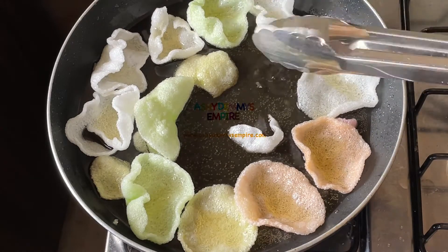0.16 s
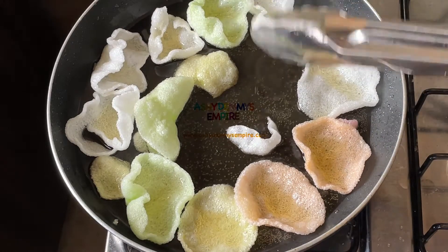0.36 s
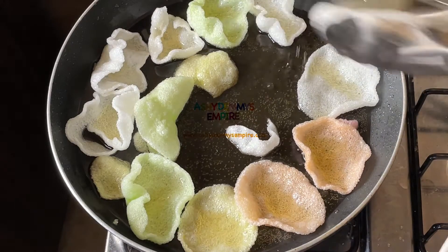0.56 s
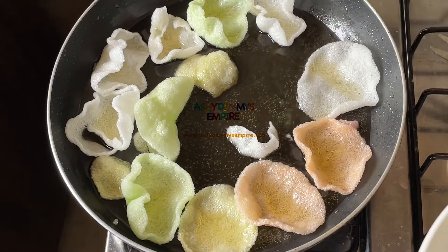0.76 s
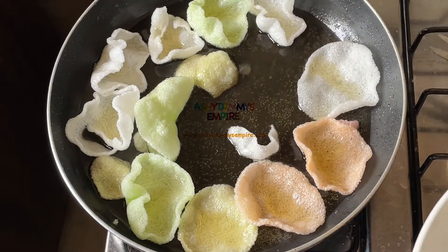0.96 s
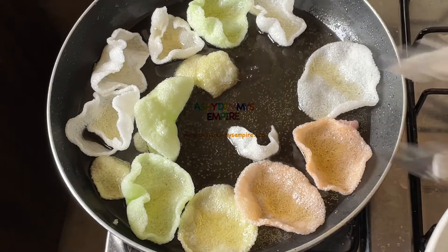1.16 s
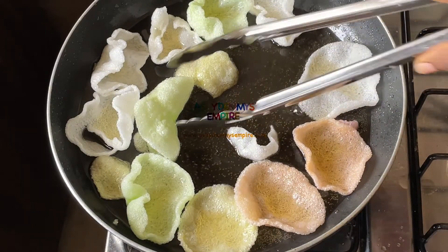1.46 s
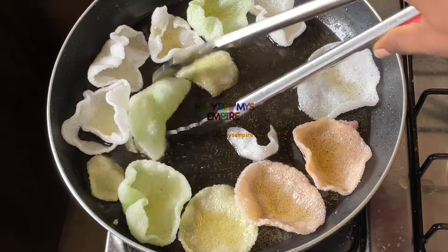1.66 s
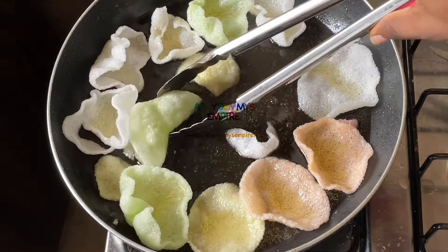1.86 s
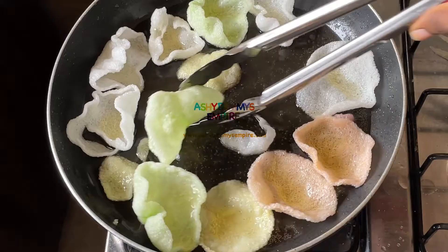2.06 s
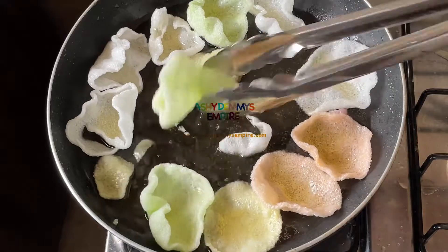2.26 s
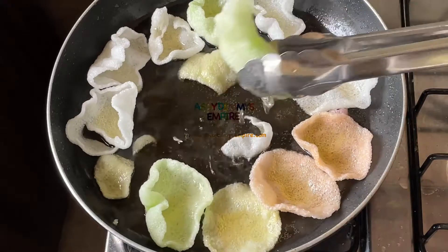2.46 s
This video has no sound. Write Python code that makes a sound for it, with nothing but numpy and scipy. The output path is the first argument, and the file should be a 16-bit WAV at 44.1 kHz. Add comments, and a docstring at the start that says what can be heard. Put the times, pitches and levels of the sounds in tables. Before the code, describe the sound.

Crackers fry in a shallow pan of hot oil: irregular dry pops and tiny bright spits over soft fizz, with two very loud bursts ringing the pan, heard close in stereo in a kitchen with a faint low hum.

```python
"""Puffed crackers fry in a shallow pan of hot oil in a kitchen, heard close by a pair of microphone ports.
Steam pockets tear the skin with a snap and a crack and ring briefly at a pitch; large bursts ring the pan
and splash oil; droplets spit bright noise ticks, one spray hisses, tongs tinkle once and tiny bubbles ring.
The oil fizzes softly as coloured noise, the room answers with a clumpy tail of echoes,
and far off a slow motor hums as a few wavering harmonics."""
import sys
import numpy as np
from scipy import signal
from scipy.fft import rfft, irfft, next_fast_len
from scipy.io import wavfile

SR = 44100
rng = np.random.default_rng(int(sys.argv[2]) if len(sys.argv) > 2 else 0)


def transcribe(signal):
    """Save signal, clipped to [-1, 1], as a 16-bit WAV file at the path in sys.argv[1]."""
    frames = np.atleast_2d(signal).T
    limited = np.clip(frames, -1, 1)
    pcm = np.round(limited * 32767).astype(np.int16)
    wavfile.write(sys.argv[1], SR, pcm)


N = 114660
T = np.arange(12000) / SR   # seconds since the start of one short event


def amp(db):
    """Decibels to a factor of amplitude."""
    return 10 ** (np.asarray(db) / 20)


def rms_one(x):
    """Scales a signal to an rms of 1."""
    return x / np.sqrt(np.mean(x ** 2) + 1e-20)


def at_hz(points, hz):
    """Reads a curve of (f/Hz, value) points along log frequency."""
    point_hz, values = np.array(points).T
    return np.interp(np.log(hz), np.log(point_hz), values)


def drift(rate_hz):
    """Slow chance of rms 1: noise through two equal low-pass poles at rate_hz, run on every 40th sample."""
    pole = np.exp(-80 * np.pi * rate_hz / SR)
    noise = rng.standard_normal(N // 40 + 2002)
    slow = signal.lfilter([1], [1, -2 * pole, pole * pole], noise)[2000:]   # drops the settling
    return np.interp(np.arange(N) / 40, np.arange(len(slow)), rms_one(slow))


def grainy():
    """Noise in uneven millisecond grains."""
    grain_db = 3 * rng.standard_normal(N // 60 + 2)
    return rng.standard_normal(N) * amp(np.interp(np.arange(N) / 60, np.arange(N // 60 + 2), grain_db))


def ring(clicks, hz, t60):
    """A damped resonance: a unit click sets off a sine of height 1 that falls 60 dB in t60 seconds."""
    r = amp(-60 / (max(t60, 1e-3) * SR))
    w = 2 * np.pi * hz / SR
    return signal.lfilter([0, np.sin(w)], [1, -2 * r * np.cos(w), r * r], clicks + 1e-18)


def band(x, low_hz, high_hz):
    """Passes the band between two frequencies."""
    return signal.sosfilt(signal.butter(2, [low_hz, high_hz], "band", fs=SR, output="sos"), x)


def colour(x, spectrum):
    """Weights noise by a spectrum of (f/Hz, level/dB) points."""
    return irfft(rfft(x) * amp(at_hz(spectrum, np.fft.rfftfreq(N, 1 / SR) + 1)), N)


def add(out, start_s, peak_db, sound):
    """Lays a sound in at a moment with a given peak."""
    i = int(start_s * SR)
    out[i:i + len(sound)] += (amp(peak_db) * sound / np.abs(sound).max())[:N - i]


def motor():
    """A slow motor far off: harmonics of one wandering turning rate, each wavering in level."""
    # harmonics: multiple of the turning rate, level/dB (rms; the two lowest relative to the hum level)
    harmonics = [(2.0, -10), (3.0, -2), (6.0, -48.5), (7.0, -48.5), (10.0, -48.5)]
    # wavering level shared by the two lowest harmonics: t/s, level/dB
    hum_level = [(0, -40), (.13, -38), (.22, -48.5), (.46, -39.5), (.68, -55), (.93, -38.5), (1.18, -55),
                 (1.37, -42), (2.6, -41.5)]
    turning_hz, upper_waver_db = 22.45, 3.5
    turn = 2 * np.pi * np.cumsum(turning_hz * (1 + 0.00419 * drift(1.0))) / SR
    low_db = np.interp(np.arange(N) / SR, *np.transpose(hum_level))
    hum = 0
    for n, (multiple, db) in enumerate(harmonics):
        level_db = db + (low_db if n < 2 else upper_waver_db * drift(4.7))
        phase = rng.uniform(0, 2 * np.pi)
        hum = hum + np.sqrt(2) * amp(level_db) * np.sin(multiple * turn + phase)
    return hum


def fizz():
    """Fine fizz of the oil and air of the room: noise partly unlike at the two ports; the treble flickers."""
    # relative spectrum of the fizz: f/Hz, level/dB (per Hz)
    fizz_spectrum = [(25, -51), (40, -4), (150, -1), (280, -5.5), (500, -8.5), (800, -5.5), (2100, -10.5),
                     (3200, -19), (4800, -23), (7000, -18), (13000, -20.5), (15700, -19), (16100, -51)]
    # likeness of the two ports: f/Hz, likeness (1 = the same at both)
    fizz_likeness = [(100, .9995), (400, .93), (1500, 0.5), (5000, 1), (9000, 1)]
    fizz_db = -39.5   # rms level about which the fizz wavers
    hz = np.fft.rfftfreq(N, 1 / SR) + 1
    alike = np.clip(at_hz(fizz_likeness, hz), 0, 1)
    mid, side = rfft(rng.standard_normal((2, N))) * amp(at_hz(fizz_spectrum, hz))
    both = irfft(np.sqrt(1 + alike) * mid + np.sqrt(1 - alike) * side * [[1], [-1]], N)
    flicker = amp(2.6 * drift(34)) - 1
    both = both + band(both, 2600, 20000) * flicker
    return amp(fizz_db + 1.28 * drift(3.7)) * rms_one(both)


def small_bubbles():
    """Faint bubbles burst in random clusters, each ringing a few cycles at one of 16 pitches."""
    median_per_s, smallest_db, ring_cycles = 120, -37, 9.7   # cycles in a fall of 60 dB
    sizes = amp(2.65 * np.minimum(rng.exponential(1, N), 3)) * rng.choice([-1, 1], N)
    born = rng.random(N) < median_per_s * amp(4 * drift(8)) / SR
    pitch_number = rng.integers(0, 16, N)
    bubbles = np.zeros(N)
    for k, hz in enumerate(np.geomspace(1620, 6470, 16)):
        bubbles += ring(sizes * born * (pitch_number == k), hz, ring_cycles / hz)
    return amp(smallest_db) * bubbles


def ticks():
    """Droplets spit very short bright bursts of noise; dripping oil hisses in one longer grainy spray."""
    # spitting droplets: t/s, level/dB (peak of the upper treble), lower treble level/dB (re that peak)
    droplets = [(0.5673, -11.5, -18), (0.7657, -10.5, -15), (1.075, -15.5, -10), (1.2529, -8.5, 4),
                (1.5289, -15.5, -8), (1.6213, -12, -8), (2.5326, -22, 8.5)]
    # hiss as oil drips back: start t/s, length t/s, level/dB (peak)
    spray = (2.335, 0.041, -20.5)
    tick_t60_s = 0.004
    out = np.zeros(N)
    for start_s, peak_db, lower_db in droplets:
        spit = rng.standard_normal(len(T)) * amp(-60 * T / tick_t60_s)
        add(out, start_s, peak_db, band(spit, 5900, 17900))
        add(out, start_s, peak_db + lower_db, band(spit, 1650, 9600))
    start_s, length_s, peak_db = spray
    shape = np.exp(-(T / length_s) ** 4) * (1 - np.exp(-T / 0.00068))
    add(out, start_s, peak_db, band(grainy()[:len(T)], 1900, 15000) * shape)
    return out


def tongs():
    """The tongs touch metal lightly: a short grainy scuff sets a few damped modes tinkling."""
    # the touch: t/s, level/dB (peak that the modes refer to)
    touch = (.852, -21.5)
    # modes of the tongs: f/Hz, level/dB (peak re the touch), t60 t/s
    tong_modes = [(1060, -1.5, 0.065), (1790, 3, 0.063), (2896, -6.5, 0.05)]
    start_s, touch_db = touch
    out = np.zeros(N)
    noise = rng.standard_normal((len(tong_modes), len(T)))
    scuffs = noise * np.abs(grainy()[:len(T)]) * T * np.exp(-T / 0.0025)
    for scuff, (hz, mode_db, t60) in zip(scuffs, tong_modes):
        add(out, start_s, touch_db + mode_db, band(ring(scuff, hz, t60), hz / 5.3, hz * 1.6))
    return out


def bursts():
    """Large bursts: a few milliseconds of tearing noise ring the pan's modes; oil splashes in grains."""
    # bursts: t/s, level/dB (peak of the ringing), length t/s, splash level/dB (re peak),
    # tilt of the pan modes/dB per octave about 1 kHz
    burst_rows = [(0.951, 1, 0.0053, -6.5, 0.5), (1.309, -8, 0.0071, -3.5, -9), (1.714, 1, 0.0055, -5, 0)]
    # modes of the pan: f/Hz, level/dB (relative), t60 t/s
    pan_modes = [(525, -11, 0.05), (593, -7.5, 0.044), (814, -4.5, 0.044), (1001, -1.5, 0.04),
                 (1043, -2.3, 0.057), (1742, -12, 0.045), (2000, -4, 0.011), (2300, -6.5, 0.024),
                 (2930, -10.5, 0.025)]
    # relative spectrum of the splash: f/Hz, level/dB (per Hz)
    splash_spectrum = [(250, -51), (500, 1.5), (1000, -1.5), (3000, -10), (5000, -16.5), (8000, -13.5),
                       (14000, -18.5)]
    splash_t60_s = 0.17
    out, splash = np.zeros(N), colour(grainy(), splash_spectrum)
    splash_shape = amp(-60 * T / splash_t60_s) * (1 - np.exp(-T / 0.00059))
    for start_s, peak_db, length_s, splash_db, tilt_db in burst_rows:
        shape = np.exp(-(T / length_s) ** 4) * (1 - np.exp(-T / 0.00041))
        rings = np.zeros(len(T))
        for hz, mode_db, t60 in pan_modes:
            tearing = shape * rng.standard_normal(len(T))
            add(rings, 0, mode_db + tilt_db * np.log2(hz / 1000), ring(tearing, hz, t60))
        add(out, start_s, peak_db, band(band(rings, 413, 7000), 324, 9000))
        i = int(start_s * SR)
        add(out, start_s, peak_db + splash_db, splash[i:i + len(T)] * splash_shape)
    return out


def pops():
    """The skin tears in a dry broad snap with a bright crack; the steam pocket rings briefly at its pitch."""
    # steam pockets: t/s, level/dB (peak of the ring), f/Hz, ring t60 t/s, crack level/dB (re that peak)
    pockets = [(0.174, -2.5, 1304, 0.0096, -14), (0.2107, -20, 1360, 0.048, -33),
               (0.2546, -11, 2500, 0.013, -21), (0.2656, -17.5, 2250, 0.0057, -9),
               (0.2925, -26.5, 5550, 0.0065, -8), (0.3144, -13.5, 2750, 0.004, -5.5),
               (0.391, -15, 2300, 0.016, -21), (0.4401, -26, 4050, 0.0079, 2),
               (0.582, -17.5, 2300, 0.0067, -7.5), (0.6987, -19, 2700, 0.0044, -53),
               (0.738, -15, 2480, 0.0022, -7), (0.8142, -10.5, 1950, 0.019, -7.5),
               (0.8324, -18.5, 2600, .003, -4.5), (0.885, -25.5, 3800, .005, 0),
               (0.9046, -20, 3670, 0.0043, -4), (0.93, -19, 2660, .003, -3),
               (0.9904, -20, 3700, 0.0041, -6), (1.0139, -17, 2600, 0.016, -12),
               (1.05, -13, 1870, 0.01, -16), (1.1614, -19, 3230, 0.005, -1),
               (1.3468, -21.5, 3550, 0.0043, -11), (1.4596, -20.5, 2510, 0.013, -9),
               (1.5001, -19.5, 2760, 0.005, -5), (1.5051, -14, 2690, 0.017, -9.5),
               (1.5688, -10.5, 2460, 0.0077, -12.5), (1.5898, -18.5, 2750, 0.0097, -7),
               (1.6091, -22.5, 2750, .006, -7), (1.6609, -14, 1660, 0.0033, -10),
               (1.9104, -22, 5620, 0.0096, 0.5), (1.928, -23, 2220, 0.0035, -1.5),
               (1.9838, -16, 2250, 0.01, -14), (2.0139, -10.5, 1940, 0.0077, -7.5),
               (2.0309, -7.5, 1560, 0.0052, -14.5), (2.0901, -20, 4120, 0.0083, -15),
               (2.125, -14.5, 2520, .012, -25), (2.1549, -16, 2130, 0.0062, -6.5),
               (2.1869, -18, 3900, 0.003, -19), (2.1985, -16, 2310, 0.014, -8.5),
               (2.2743, -17, 2610, 0.0078, -13), (2.2919, -7.5, 2232, 0.023, -37),
               (2.3146, -22, 4180, 0.0038, -10), (2.363, -22.5, 2560, 0.0025, -5),
               (2.3929, -20, 2420, 0.0037, -14), (2.3972, -15.5, 3240, 0.0089, -36),
               (2.4672, -24.5, 3336, .004, -8)]
    tear_fall_s, tear_rise_s, tear_db, tear_width = 0.003, 0.00087, -5.5, 1.564   # width: factor each way
    push_cycles, crack_cycles = 1.12, 12.4   # crack: cycles in a fall of 60 dB
    out, grains = np.zeros(N), np.tile(np.abs(grainy()), 2)
    tear_shape = np.exp(-T / tear_fall_s) * (1 - np.exp(-T / tear_rise_s))
    for start_s, peak_db, hz, t60, crack_db in pockets:
        own_grains = grains[int(start_s * SR) - len(T) // 2:][:len(T)]
        tears = rng.standard_normal((3, len(T))) * own_grains * tear_shape
        cycles = T * hz
        push = np.sin(2 * np.pi * cycles) * cycles * np.exp(-(cycles / push_cycles) ** 2)
        pocket = ring(push + 0.17 * tears[0], hz, t60)
        add(out, start_s, peak_db, band(pocket, hz / 2, hz * 2))
        snap = band(tears[1], hz / tear_width, hz * tear_width)
        add(out, start_s, peak_db + tear_db, band(snap, hz / 2, hz * 2))
        # the crack rings four chance resonances of the crisp shell
        crack = np.zeros(len(T))
        for shell_hz in rng.uniform(2600, 6300, size=4):
            crack += ring(tears[2], shell_hz, crack_cycles / shell_hz)
        add(out, start_s, peak_db + crack_db, band(crack, 2030, 8800))
    return out


def room(x):
    """A dense noise tail of echoes in uneven clumps, dying band by band; partly unlike at the two ports."""
    # bands of the tail: f/Hz, t60 t/s, level/dB (relative)
    tail_bands = [(275, 2.7, -16), (715, 1.28, -19), (1395, 1.49, -21), (2970, 0.71, -17.5),
                  (6000, 0.76, -20), (13100, 0.64, -24.5)]
    # likeness of the two ports: f/Hz, likeness (1 = the same at both)
    room_likeness = [(300, 0.9), (1000, 0.74), (3000, 1), (9000, 1)]
    t, tail = np.arange(SR) / SR, 0
    white = rng.standard_normal((2, 2, SR))
    for n, (hz, t60, db) in enumerate(tail_bands):
        unlike = np.sqrt(1 - np.clip(at_hz(room_likeness, hz), 0, 1))
        echoes = band(white[n % 2], hz / 1.417, hz * 1.365) * amp(db - 26 - 60 * t / t60)
        tail = tail + echoes * [[1], [unlike]]
    clumps_db = 2.1 * drift(31)[:SR]
    early_db = 8.9 * np.exp(-t / 0.047)   # the first echoes stand out
    tail = tail * np.clip(t / 0.0025, 0, 1) * amp(clumps_db + early_db)
    mid, side = signal.fftconvolve(x[None], tail, axes=1)[:, :N]
    return mid + side * [[1], [-1]]


def scene():
    """The frying and its echo in the room, over the fizz and the far motor."""
    pan = small_bubbles() + ticks() + tongs() + bursts() + pops()
    return motor() + fizz() + room(pan) + pan


def record(dry):
    """The two ports hear the treble out of step and differ in balance; peaks clip; the top is cut."""
    # phase by which the left port leads: f/Hz, phase/rad
    port_phase = [(30, 0.0084), (1500, 0.05), (2600, 0.46), (5000, 0.84), (9100, 2.34), (10200, 3.32),
                  (11300, 3.62), (13100, 5.65), (16000, 9)]
    # left port over right: f/Hz, level/dB
    port_balance = [(150, 0), (700, -1.2), (2500, .3)]
    cutoff_hz = 16900
    size = next_fast_len(N + 2048)
    hz = np.fft.rfftfreq(size, 1 / SR) + 1
    # each port takes half of the difference
    half = amp(at_hz(port_balance, hz) / 2) * np.exp(0.5j * at_hz(port_phase, hz))
    ports = irfft(rfft(dry, size) * [half, 1 / half], size)[:, :N]
    top_cut = signal.cheby2(12, 60, cutoff_hz, fs=SR, output="sos")
    return signal.sosfilt(top_cut, np.clip(ports, -1, 1))


dry = scene()
out = record(dry)
transcribe(out)
```